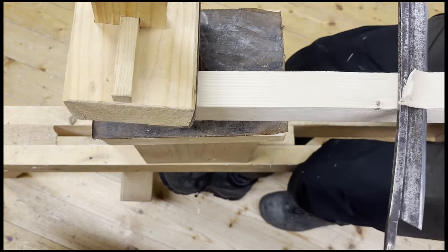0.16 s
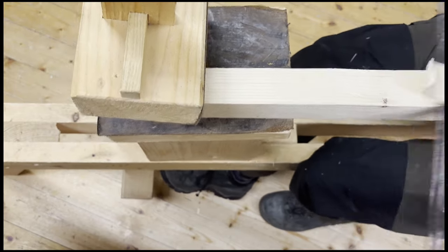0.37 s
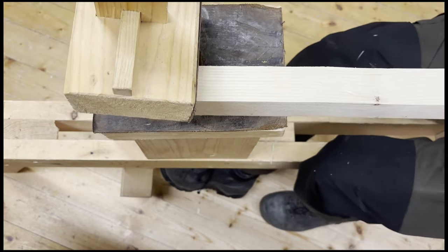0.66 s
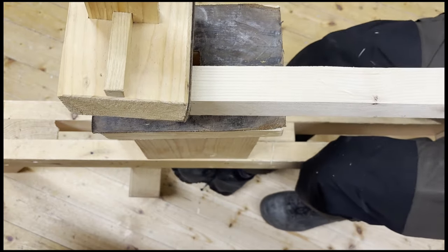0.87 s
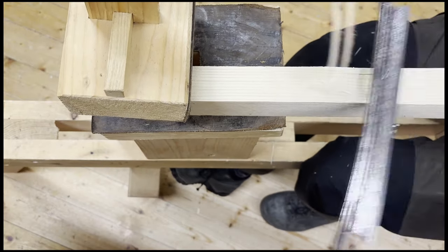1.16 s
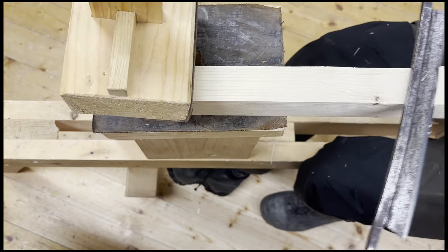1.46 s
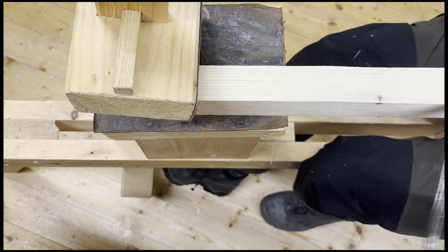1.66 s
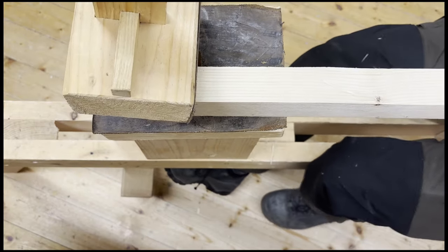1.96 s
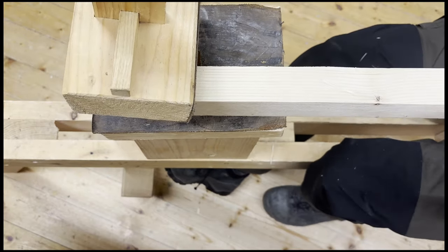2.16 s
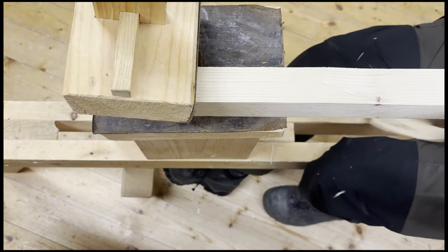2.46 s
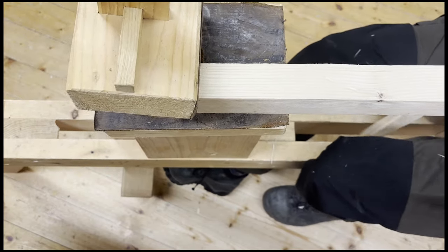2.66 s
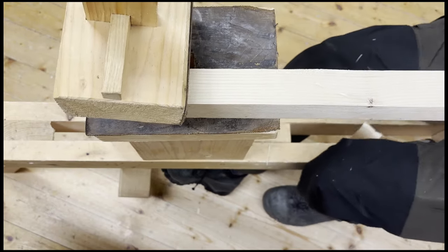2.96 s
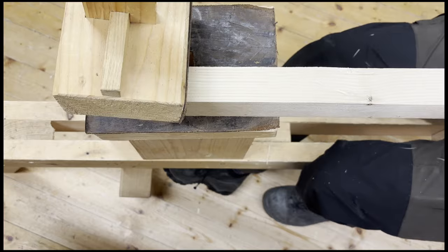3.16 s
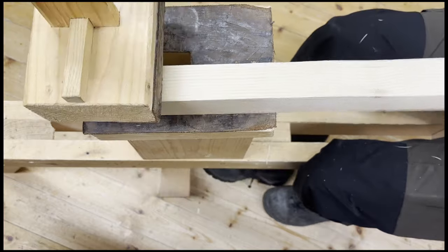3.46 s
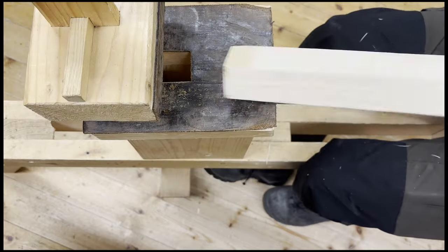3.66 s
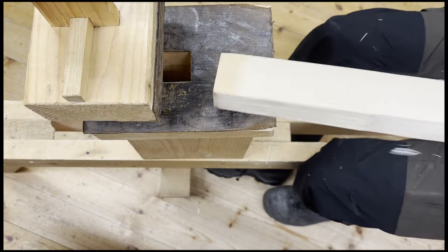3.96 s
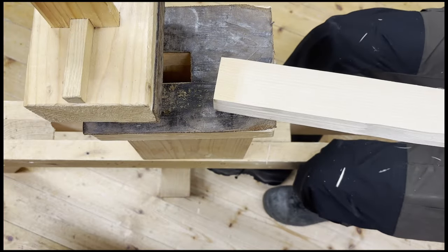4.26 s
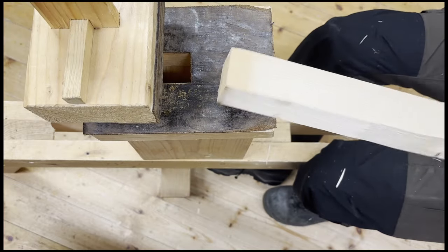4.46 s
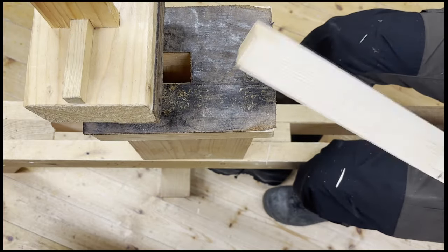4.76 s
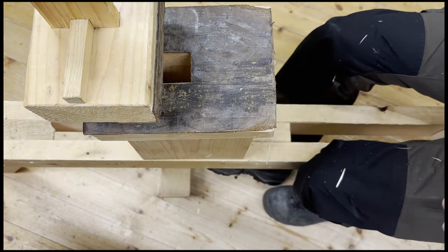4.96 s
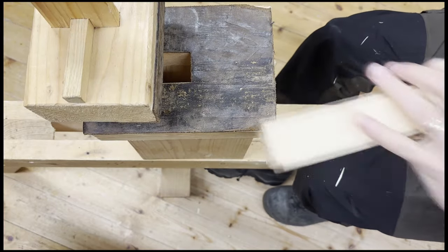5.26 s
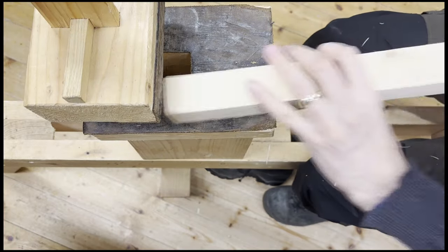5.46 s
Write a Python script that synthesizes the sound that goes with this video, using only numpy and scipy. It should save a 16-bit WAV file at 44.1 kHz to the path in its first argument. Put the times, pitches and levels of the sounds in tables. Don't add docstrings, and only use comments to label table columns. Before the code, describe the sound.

A drawknife rips shavings from a clamped softwood blank in crisp hissing bursts with snaps and knocks, then the blank is quietly handled.

```python
import sys
import numpy as np
from scipy import signal
from scipy.fft import rfft, irfft, next_fast_len
from scipy.io import wavfile
from scipy.ndimage import uniform_filter1d

SR = 44100
rng = np.random.default_rng(int(sys.argv[2]) if len(sys.argv) > 2 else 0)


def unload_wav(signal):
    wavfile.write(
        sys.argv[1],
        SR,
        np.round(np.clip(np.atleast_2d(signal).T, -1, 1) * 32767).astype(np.int16),
    )


def ratio_of_db(decibels):
    return 10 ** (np.asarray(decibels, float) / 20)


N = 246959
TIME = np.arange(N) / SR
FREED = np.clip((TIME - 3.7) / 0.079, 0, 1)


def unit(x):
    return x / np.sqrt(np.mean(x ** 2))


def colour(x, points):
    hz, db = np.transpose(points)
    size = next_fast_len(x.shape[-1] + 4096)
    f = np.maximum(np.arange(size // 2 + 1) * SR / size, 1)
    gain = ratio_of_db(np.interp(np.log(f), np.log(hz), db))
    return irfft(rfft(x, size) * gain, size)[..., :x.shape[-1]]


def drift(rate):
    count = int(6 * rate) + 2
    return np.interp(TIME[::64] * rate, np.arange(count), 1.2 * rng.standard_normal(count))


def walk(rate):
    hold = int(SR / rate)
    steps = np.repeat(rng.standard_normal(N // hold + 1), hold)
    return unit(uniform_filter1d(steps, hold // 2 + 1)[:N])


def each_sample(slow):
    return np.repeat(slow, 64)[:N]


def ring(x, modes, place_hz=None):
    filters = [signal.iirpeak(hz, hz / max(width, 5), SR) for hz, width, _ in modes]

    def favour(hz):
        near_db = 0
        if place_hz is not None:
            octaves_off = np.abs(np.log2(hz / place_hz[::64]))
            near_db = 4 - np.minimum(14 * octaves_off, 9)
        return each_sample(ratio_of_db(drift(30) + near_db))

    def body(v, weight):
        out = 0
        for k, ((hz, _, db), peak) in enumerate(zip(modes, filters)):
            out = out + (-1) ** k * ratio_of_db(db) * signal.lfilter(*peak, v * weight(hz))
        return out

    response = body(signal.unit_impulse(SR // 2), lambda hz: 1)
    return body(x, favour) / np.sqrt(np.sum(response ** 2))


def phase_stereo(mid, side):
    # hz, phase_rad
    lead = [(0, 0), (250, -.2), (690, -.8), (1500, -.1), (2240, 1), (2760, 2.85), (3790, 1.5), (4820, 1),
            (5400, 2.3), (5850, 3.14), (6250, 3.75), (10300, 9.22), (11180, 9.62), (15700, 15.6)]
    hz, s, z = signal.stft(np.array([mid, side]), SR, nperseg=1024)
    reach = 0.2 * np.interp(hz, [0, 3000, 7000, 10000], [0, 1, 1, .3])
    sway = reach[:, None] * np.interp(s, TIME[::64], drift(9))
    half = (np.interp(hz, *np.transpose(lead))[:, None] + sway) / 2
    turned = z * np.array([np.cos(half), 1j * np.sin(half)])
    mid, side = signal.istft(turned, SR, nperseg=1024)[1][:, :N]
    return np.array([mid + side, mid - side])


def air():
    # hz, level_db
    room_tone = [(18, -32.5), (30, -8), (328, -15), (2030, -33.5), (2840, -33.5), (5030, -35),
                 (5730, -41.5), (7830, -34.5), (15000, -39.5)]
    return ratio_of_db(-62) * phase_stereo(*unit(colour(rng.standard_normal((2, N)), room_tone)))


def fibres(rate, spread_db, grab_db, rub):
    chance = rng.random((2, N))
    size = ratio_of_db(spread_db * np.minimum(-np.log(chance[1] + 1e-9), 4))
    snaps = (chance[0] < rate / SR) * size * rng.choice([-1., 1.], N)
    grab = ratio_of_db(grab_db * walk(60) + grab_db * walk(250))
    return unit((unit(snaps) + rub * rng.standard_normal(N)) * grab)


def press(rows, kind):
    *columns, attack_s = kind
    share_db, part, release = (np.reshape(k, (-1, 1)) for k in columns)
    power = np.zeros((4, N))
    for start, length, db, swell_db, *extra_db in rows:
        span = slice(int(start * SR), int((start + length + .4) * SR))
        t = TIME[span] - start
        level_db = db + swell_db * np.clip(t / length, 0, 1) + share_db + part * sum(extra_db)
        level_db = level_db - release * np.maximum(t - length, 0)
        power[:, span] += (ratio_of_db(level_db) * np.clip(t / attack_s, 0, 1)) ** 2
    return power


def cutting():
    # start_s, length_s, hiss_db, swell_db, depth_db
    cuts = [(0.0, 0.029, -37.5, -2, 5.5), (.026, 0.026, -32.5, 2.5, 4.5), (.308, 0.029, -29, 1, 0.5),
            (.35, 0.024, -28.5, 0, -1), (.496, 0.013, -31, -9.5, 6.5), (.617, 0.022, -28.5, -8.5, 9),
            (.703, 0.019, -31.5, 1.5, 7), (.72, 0.027, -30.5, 0, 1.5), (1.111, 0.016, -53, -29, 19.5),
            (1.394, 0.063, -58.5, 6, 12.5), (1.436, 0.16, -30, -2, 6), (1.608, 0.02, -31, -4.5, 5),
            (1.651, 0.049, -31, -0.5, 2.5), (1.828, 0.019, -33, -1, 7.5), (1.917, 0.018, -41, -5.5, 12),
            (1.982, 0.037, -35, -0.5, 5.5), (2.432, 0.073, -43.5, 9, 8), (2.499, 0.12, -31, -2.5, 4),
            (2.781, 0.037, -26, -11, 3.5), (2.834, 0.04, -36.5, -2, 9), (3.151, 0.014, -46, -1.5, 13),
            (3.165, 0.076, -31, -6, 7), (3.25, 0.07, -30.5, -4, 6), (3.374, 0.012, -28, -5.5, 3.5),
            (3.577, 0.024, -38.5, -5, 5.5)]
    # start_s, length_s, hiss_db, swell_db
    tears = [(.14, 0.015, -35, -6.5), (.375, 0.047, -27.5, 8), (.425, 0.053, -23, 0.5), (.52, 0.14, -44, 6),
             (1.022, 0.039, -45.5, -9), (1.09, 0.01, -30.5, -7), (1.216, 0.022, -54.5, 7),
             (1.29, 0.16, -58, 7.5), (1.715, 0.049, -32.5, 5), (1.76, 0.05, -28.5, 8.5),
             (2.04, 0.05, -49, 4), (2.09, 0.033, -42, -1.5), (2.146, 0.0074, -37, 3),
             (2.403, 0.024, -51, 7), (2.59, 0.016, -27, -8), (2.62, 0.13, -38, 3), (2.745, 0.02, -38.5, 17),
             (3.032, 0.033, -54.5, 0.5), (3.42, 0.22, -52, 4.5)]
    # start_s, length_s, head_db, swell_db, bench_over_head_db
    shoves = [(0.0, 0.29, -44, -16, 12.5), (.345, 0.08, -37, 4, 9.5), (.415, 0.026, -28.5, -4.5, -9.5),
              (.5, 0.086, -41.5, -7.5, 6), (.62, 0.036, -43, -6, 6.5), (.91, 0.13, -47, -8.5, 6),
              (1.03, 0.2, -44.5, -3.5, -1.5), (1.272, 0.18, -40, -8.5, -3.5), (1.45, 0.43, -54, 2, 16.5),
              (1.838, 0.01, -25.5, -3.5, 5), (2.05, 0.23, -47.5, -18.5, 3), (2.319, 0.046, -41, -2, 1),
              (2.5, 0.031, -35.5, 3.5, -1), (2.78, 0.066, -40, -5.5, 16.5), (2.945, 0.048, -39, -4, 1.5),
              (3.16, 0.17, -36.5, 1, -3.5), (3.398, 0.034, -28.5, -3, 10), (3.575, 0.013, -36.5, 4, 0),
              (3.62, 0.13, -55.5, -4, -4), (3.738, 0.12, -54, -3.5, -4), (4.05, 0.07, -76.5, -15.5, 29.5),
              (5.425, 0.082, -62, -11, 13.5), (5.512, 0.068, -61, -5, 18.5)]
    # start_s, length_s, rub_db, swell_db, grip_db
    rubs = [(3.76, 0.036, -54, -11, -12), (3.9, 0.11, -74.5, 11.5, 4.5), (4.14, 0.27, -70, 10.5, 2.5),
            (4.4, 0.031, -61.5, -3.5, 10.5), (4.45, 0.12, -74, 8.5, 3.5), (4.6, 0.16, -82, 2.5, 11.5),
            (4.905, 0.035, -56.5, -1, -13), (5.015, 0.035, -53.5, -4, -6), (5.06, 0.11, -65, 15, -3),
            (5.15, 0.028, -46, -7, 6), (5.24, .015, -75, -11, 8), (5.515, 0.1, -61.5, -6, 7)]
    # share_db, part of the last event column added, release_db_per_s, attack_s
    cut_kind = (1.5, 3.5, -9.5, -7.5), (0.041, 0.93, 0.92, 1), (300, 420, 300, 179), 0.0017
    tear_kind = (-2, -7, -10, -14.5), 0, (910, 700, 509, 300), 0.0063
    shove_kind = (-16, -19, -2.5, 2.5), (0, 0, 0, 1), (399, 349.5, 256.3, 189), 0.01
    hands_kind = (0, 0, -24, -24), (0, 1, 0, 0), 330, .022
    power = press(cuts, cut_kind) + press(tears, tear_kind) + press(shoves, shove_kind) + press(rubs, hands_kind)
    splinters = fibres(250, spread_db=4.5, grab_db=2.0, rub=.1)
    tearing = unit(fibres(4000, spread_db=1.5, grab_db=1.0, rub=0.94) + 0.35 * splinters)
    scraping = unit(fibres(900, spread_db=0.5, grab_db=2.1, rub=0.3) + 0.24 * splinters)
    shake = fibres(400, spread_db=0.0, grab_db=2.5, rub=1.1)
    gains = np.sqrt(power) * ratio_of_db(np.array([[4.5], [-2.5], [-2.5], [-3.0]]))
    effort_db = 10 * np.log10(power[0] + 1e-9)
    return gains * np.array([tearing, scraping, shake, shake]), effort_db


def edge(force, effort_db):
    # hz, level_db
    tear_colour = [(1500, -33.5), (2600, -0.5), (3500, -2), (4600, -6), (5600, 4.5), (8200, -5), (12000, 0),
                   (15500, -9), (17000, -12.5)]
    # hz, width_hz, level_db
    steel_modes = [(3210, 170, 2.6), (3820, 50, 1), (5120, 37, 3), (6900, 22, 2), (9190, 160, 0.48),
                   (10900, 5400, 3.2)]
    # hz, level_db
    skin_colour = [(1500, -6), (2300, -3.5), (3300, 6), (4000, -13), (5200, 9), (8200, 5), (12000, 11),
                   (16000, -7.5)]
    hiss = colour(force * (1 - FREED), tear_colour)
    bite = ratio_of_db(np.clip(2.0 * (effort_db + 25.0), -15, 0))
    rings = 0
    for hz, width, db in steel_modes:
        drive = hiss * bite * each_sample(ratio_of_db(0.89 * drift(12.0)))
        rings = rings + ratio_of_db(db) * signal.lfilter(*signal.iirpeak(hz, hz / width, SR), drive)
    return hiss + rings + colour(force * FREED, skin_colour)


def patchy(x, effort_db, patch_db, tilt):
    hz, s, z = signal.stft(x, SR, nperseg=256)
    shade = uniform_filter1d(rng.standard_normal(z.shape), size=5, axis=0)
    shade = uniform_filter1d(shade, size=9, axis=1)
    octaves = np.log2(np.maximum(hz, 2000)[:, None] / 7000)
    bright = tilt * octaves * np.clip(np.interp(s, TIME, effort_db) + 12.0, -12, 12)
    return signal.istft(z * ratio_of_db(patch_db * unit(shade) + bright), SR, nperseg=256)[1][:N]


def blank(force):
    # hz, width_hz, level_db
    clamped_modes = [(836, 72, -2), (922, 60, -5), (1030, 45, -1.5), (1145, 68, -4.5), (1233, 150, -4),
                     (1386, 170, -5), (1729, 140, -9), (1929, 70, -3), (2065, 90, -2), (2220, 90, -3),
                     (2870, 420, -4.5)]
    free_modes = [(850, 16, 10.5), (1040, 45, 6), (1950, 39, 6.5), (2270, 73, 3), (1760, 10000, -17.5)]
    # time_s, pitch_hz
    touched = [(0, 1290), (.7, 1050), (.75, 1950), (1.1, 1300), (1.45, 1090), (2.0, 1040), (2.5, 1150),
               (2.86, 1030), (3.2, 1100), (3.32, 850), (3.398, 1064), (3.52, 1000), (3.58, 1570),
               (4.42, 1876), (5.1, 1900), (5.16, 1270), (5.3, 1700), (5.6, 1900)]
    place_hz = np.interp(TIME, *np.transpose(touched))
    return ring(force * (1 - FREED), clamped_modes, place_hz) + ring(force * FREED, free_modes, place_hz)


def rocking():
    # start_s, peak_db, pitch_hz, fade_s
    swings = [(0.021, -33.5, 75.4, .017), (0.351, -24.5, 110, .017), (0.418, -17, 420, 0.014),
              (0.4246, -2, 186, 0.0054), (.441, -22, 380, 0.012), (0.43, -14, 73.4, .02),
              (0.441, -16.5, 95, 0.0092), (0.4538, -13.5, 150, 0.0079), (0.921, -28.5, 55, .017),
              (0.942, -33.5, 78.5, 0.015), (1.609, -46, 89, 0.018), (1.798, -36, 58.6, .017),
              (1.845, -25.5, 172, 0.016), (2.805, -25, 165, 0.015), (2.955, -30, 191, .02),
              (3.399, -19.5, 605, 0.0059), (3.402, -19, 450.3, .022), (3.4072, -14.5, 211, 0.02),
              (3.4097, -10.5, 148.7, 0.014), (3.3989, -12.5, 1208, 0.0054), (4.056, -43.5, 108.8, .017),
              (5.432, -48, 106, 0.018), (5.519, -43.5, 420, 0.019), (5.521, -43.5, 556, 0.018)]
    out, t = np.zeros(N + SR), np.arange(SR // 4) / SR
    for s, db, hz, fade_s in swings:
        envelope = (1 - np.exp(-t / 0.0021)) * np.exp(-t / fade_s)
        out[int(s * SR):int(s * SR) + len(t)] += ratio_of_db(db + 4.0) * np.sin(2 * np.pi * hz * t) * envelope
    return out[:N]


def knocks():
    # start_s, crack_db, crack_hz
    snaps = [(.4026, -13, 12400), (0.4275, -8, 12920), (0.463, -13.5, 12600), (.411, -10.5, 13000),
             (0.451, -9.5, 5000), (0.4843, -5.5, 12900), (0.5171, -15.5, 7200), (.5683, -15.5, 12100),
             (.605, -11, 6990), (.9711, -37, 2000), (1.0244, -32.5, 8610), (1.053, -41, 5200),
             (1.0943, -25.5, 4950), (1.218, -27, 8720), (1.2862, -28.5, 8700), (1.3608, -41.5, 2000),
             (1.73, -13.5, 7300), (1.7692, -16.5, 13100), (1.78, -12.5, 7500), (1.799, -8, 5000),
             (1.8142, -8, 13700), (1.842, -17.5, 5000), (2.103, -31, 7040), (2.1465, -25, 3930),
             (2.5022, -19, 3410), (2.5924, -18, 7000), (2.6723, -29.5, 8000), (2.7197, -27, 7900),
             (2.7371, -21.5, 9100), (2.7667, -6, 4570), (2.995, -50, 4500), (3.0337, -28.5, 9100),
             (3.136, -54.5, 1500), (3.2751, -21, 4520), (3.3329, -24, 8000), (3.7753, -51, 8000)]
    # start_s, crack_db, blank_over_crack_db, crack_hz
    bites = [(0.0277, -21.5, -4.5, 6800), (0.0536, -14.5, -5.5, 5140), (0.3129, -33.5, -4, 5000),
             (0.3516, -16, -3, 6860), (0.4971, -10, -9.5, 3900), (0.7023, -27, 1.5, 6500),
             (1.3947, -35, 2, 5000), (1.433, -26.5, -1, 13000), (1.6507, -24, 0.5, 7090),
             (1.8293, -27, 3.5, 3210), (1.9163, -21.5, -6.5, 5000), (1.9811, -29.5, 1, 7990),
             (2.0302, -27, -8, 3660), (2.9447, -47.5, 14, 3330), (3.1485, -45, 7.5, 9200),
             (2.7811, -26.5, 0, 4500), (2.8339, -22.5, -4.5, 5000), (3.1637, -25, -4, 5000),
             (1.112, -36.5, 3.5, 5000)]
    # start_s, crack_db, then blank_db, head_db, bench_db above the
    thuds = [
        (1.274, -41.5, 0, 7.5, -11),
        (2.3199, -41.5, -1.5, 13, 3),
        (3.3745, -30.5, -5, 6, -13),
        (3.3982, -12, -10, 0.5, -5.5),
        (3.5741, -24.5, 0, 1.5, -14),
        (3.7401, -54, -9, 9, 3),
        (5.1645, -33.5, -4, -31, -32),
        (5.177, -39, -6.5, -25.5, -30),
        (5.424, -52.5, -2.5, 3.5, 9),
        (5.5175, -48.5, -6, 6.5, 19.5),
    ]
    snap_under = -29, -37.5, -33
    bite_under = -7.5, -11.5
    blows = [(s, db, *snap_under, hz) for s, db, hz in snaps]
    blows += [(s, db, tap, tap + bite_under[0], tap + bite_under[1], hz) for s, db, tap, hz in bites]
    blows += [(*row, 5000) for row in thuds]
    size = 1500
    forces, t = np.zeros((4, N + size)), np.arange(size) / SR
    for s, db, blank_db, head_db, bench_db, hz in blows:
        noise = rng.standard_normal(size)
        burst = noise * (np.exp(-t / .0015) + .2 * np.exp(-t / .005))
        crack = ratio_of_db(-3.5) * (burst + 1.8 * signal.lfilter(*signal.iirpeak(hz, 4.0, SR), burst))
        tap = ratio_of_db(blank_db + 4.0) * (3 * np.exp(-t / .0001) + noise * np.exp(-t / 0.0042))
        head = ratio_of_db(head_db - 0.5) * np.exp(-t / 0.00085)
        bench = ratio_of_db(bench_db - 7.5) * np.exp(-((t - .008) / 0.00052) ** 2)
        forces[:, int(s * SR):int(s * SR) + size] += ratio_of_db(db) * np.array([crack, tap, head, bench])
    return forces[:, :N]


def woodwork():
    # hz, width_hz, level_db
    head_modes = [(396.4, 48, 2.5), (459, 63, -1), (491, 37, 4), (600, 80, -3.5), (680.5, 32, 1.5),
                  (546, 420, -1)]
    bench_modes = [(71.8, 12, -4), (121, 50, -8.5), (142, 20, -0.5), (180, 21, -1.5), (220.6, 14, -5),
                   (300, 72, -11.5)]
    steady, effort_db = cutting()
    on_edge, on_blank, on_head, on_bench = steady + knocks()
    hiss = patchy(edge(on_edge, effort_db), effort_db, patch_db=1.14, tilt=0.012)
    return hiss + blank(on_blank) + ring(on_head, head_modes) + ring(on_bench, bench_modes)


def squeaks():
    # start_s, length_s, level_db, pitch_hz
    chatters = [(0.31, 0.014, -23, 2090), (0.31, 0.014, -27, 1370), (0.349, 0.0063, -19, 1260),
                (0.729, 0.022, -32.5, 1940), (1.981, 0.02, -29, 1040), (2.858, 0.022, -24.5, 1030),
                (3.372, 0.011, -27, 2050), (3.542, 0.013, -43, 2220), (5.025, 0.037, -55, 1040),
                (1.682, .008, -25, 1200), (2.025, .01, -29, 1000), (.437, .012, -27, 1080),
                (3.195, .022, -29, 1050), (3.172, .03, -31, 620), (3.32, .045, -37, 850),
                (4.41, .08, -64, 850)]
    out = np.zeros(N)
    for s, length, db, hz in chatters:
        rise, fall = (TIME - s) / 0.0012, (s + length - TIME) / 0.0022 + 1
        shape = np.clip(np.minimum(rise, fall), 0, 1)
        out += ratio_of_db(db) * shape * np.sin(2 * np.pi * hz * TIME + 0.4 * walk(150))
    return out


def palm():
    # time_s, level_db
    slide = [
        (4.22, -81),
        (4.302, -61.5),
        (4.486, -64),
        (4.701, -73),
    ]
    s, db = np.transpose(slide)
    level = ratio_of_db(np.interp(TIME, s, db, left=-120, right=-120) + 1.5)
    skin_modes = [(3030, 560, 0.45), (3450, 300, -1.7), (1910, 150, -1.5)]  # hz, width_hz, level_db
    return ring(rng.standard_normal(N) * level, skin_modes)


def shop(x):
    # band_hz, t60_s
    decay = [(150, .4), (600, 0.33), (2400, 0.22), (9000, 0.41)]
    share = [-28.5, -7, -6.5, -13.5]
    t = np.arange(SR // 2) / SR
    tail = 0
    for (hz, t60), db in zip(decay, share):
        octaves = signal.butter(2, [hz / 2, hz * 2], "bandpass", fs=SR, output="sos")
        band = unit(signal.sosfilt(octaves, rng.standard_normal((3, len(t)))))
        fade = np.exp(-np.log(1000) * t / t60) * np.minimum(t / 0.0021, 1)
        even = np.sqrt(3 * hz / SR * 2 * np.log(1000) / t60 / SR)
        tail = tail + ratio_of_db(db) * band * even * fade
    return signal.fftconvolve(x[None], 1.29 * tail, axes=1)[:, :N]


def scene():
    near = woodwork() + rocking() + squeaks() + palm()
    walls = shop(near)
    sides = colour(walls[2], [(150, -17), (600, -1.0), (1200, -3.0), (3500, -8), (5500, -9.5), (12000, -9)])
    heard = phase_stereo(near + walls[0], ratio_of_db(-2.0) * (near + 0.81 * walls[1]))
    return heard + sides * np.array([[1], [-1]]) + air()


def roll_off(x):
    return signal.sosfilt(signal.butter(12, 16500, fs=SR, output="sos"), x)


def record(dry):
    dry = signal.sosfilt(signal.butter(2, 45, "highpass", fs=SR, output="sos"), dry)
    rounded = .9 * np.tanh(dry / .9)
    mix = signal.sosfilt(signal.ellip(8, .3, 36, 15750, fs=SR, output="sos"), rounded)
    return roll_off(mix)


dry = scene()
out = record(dry)
unload_wav(out)
```